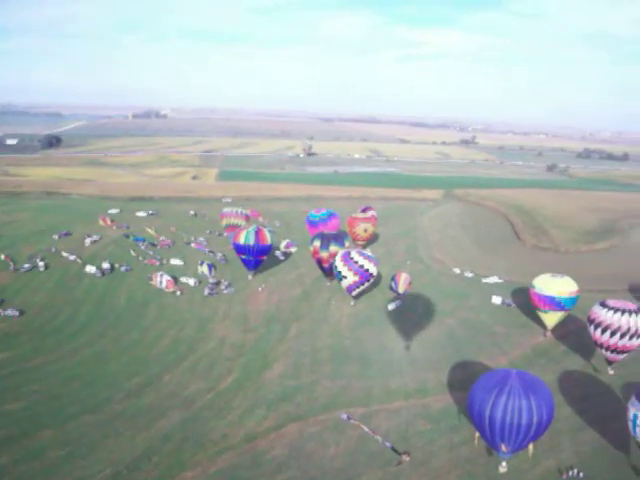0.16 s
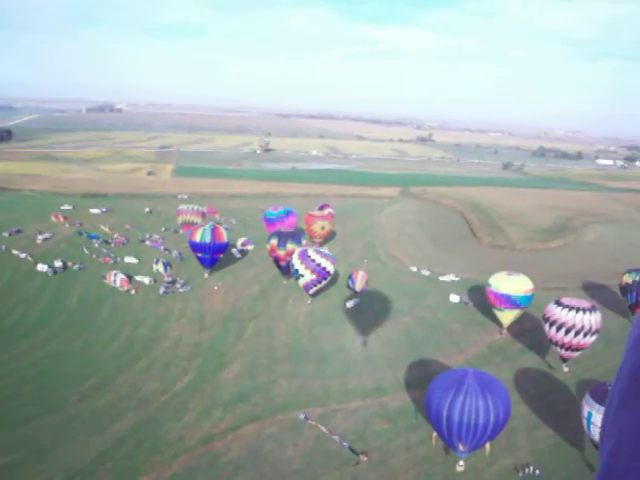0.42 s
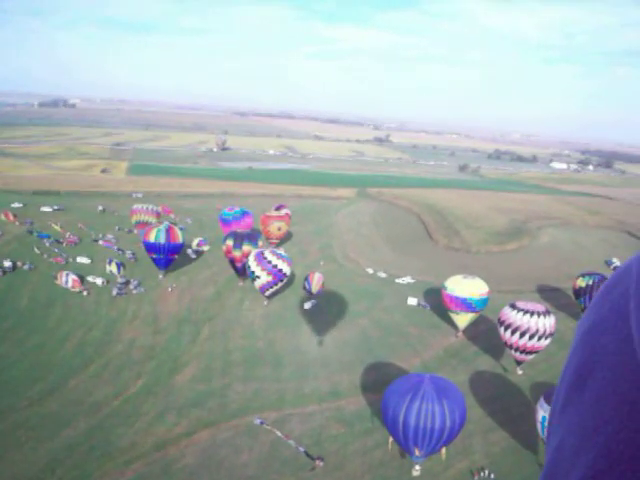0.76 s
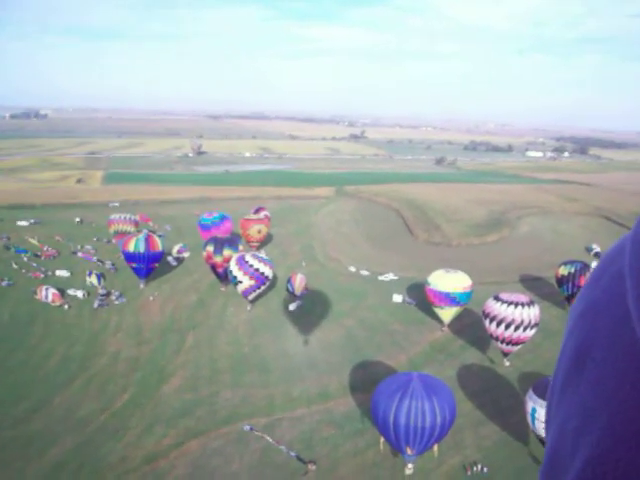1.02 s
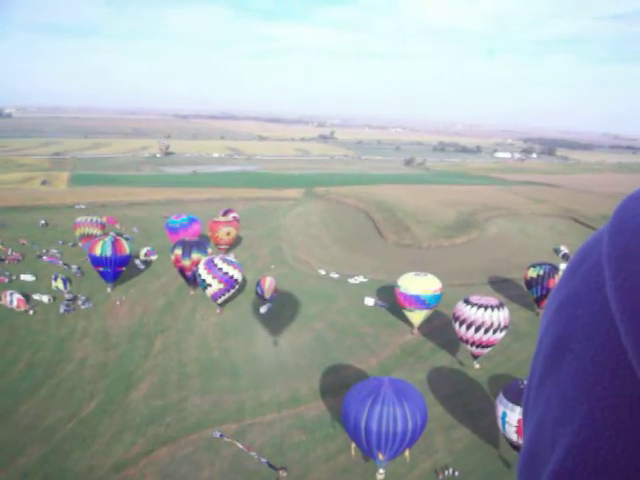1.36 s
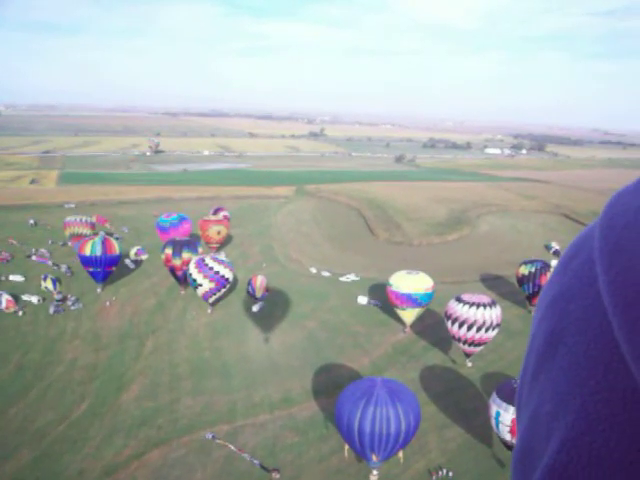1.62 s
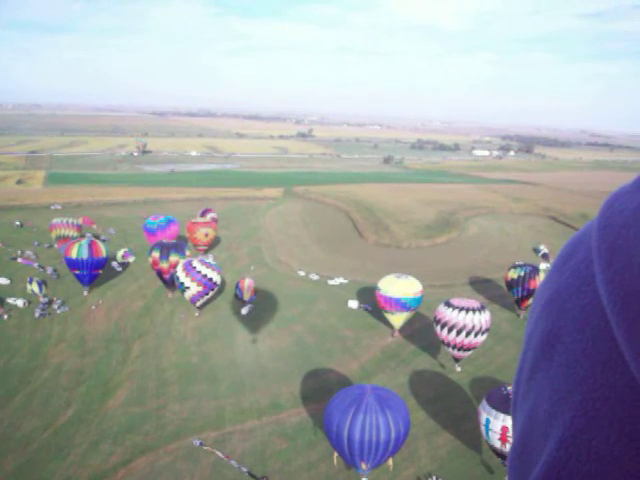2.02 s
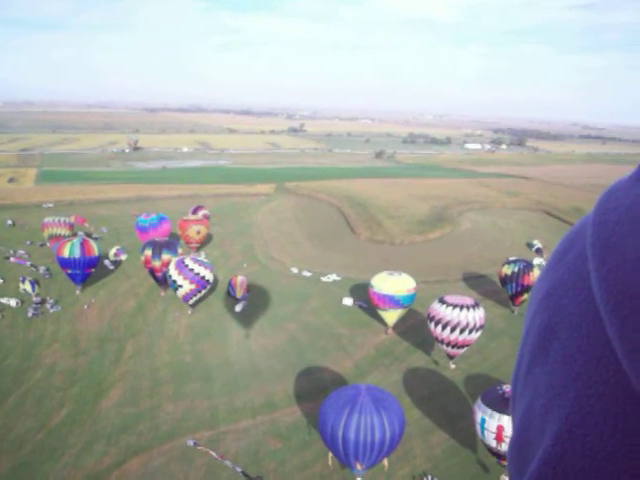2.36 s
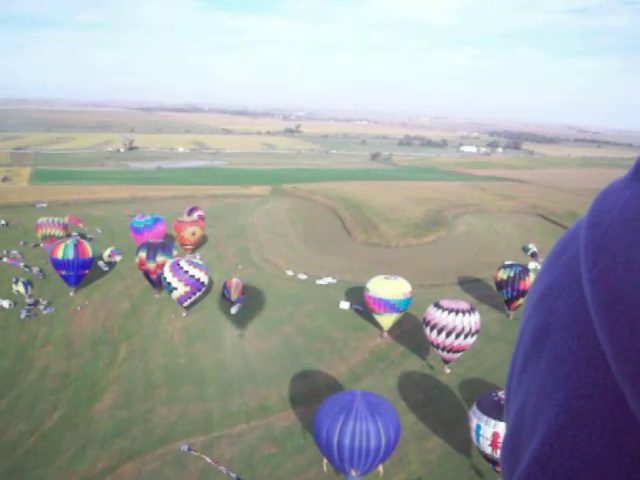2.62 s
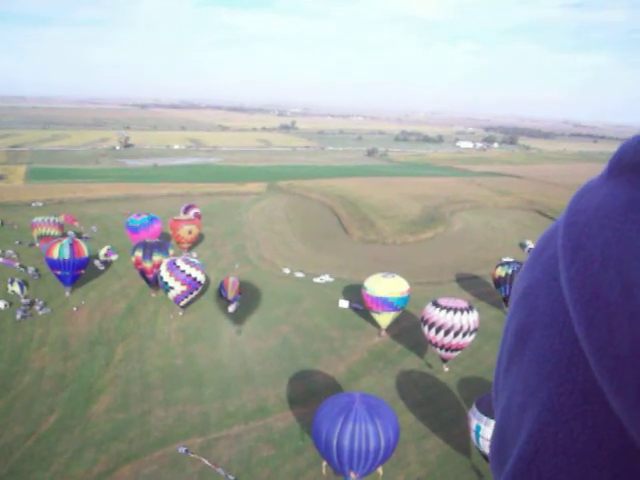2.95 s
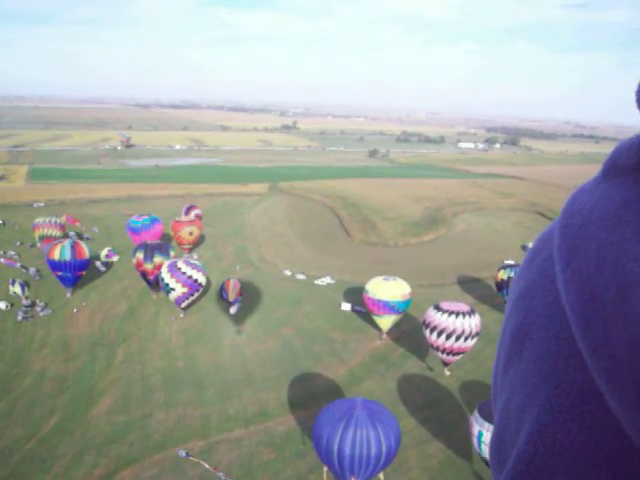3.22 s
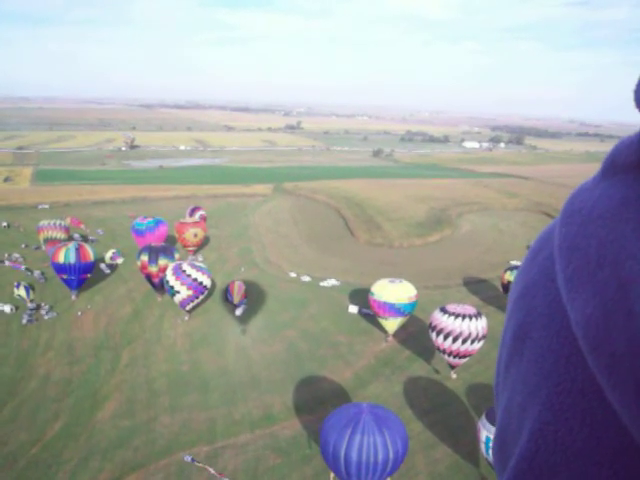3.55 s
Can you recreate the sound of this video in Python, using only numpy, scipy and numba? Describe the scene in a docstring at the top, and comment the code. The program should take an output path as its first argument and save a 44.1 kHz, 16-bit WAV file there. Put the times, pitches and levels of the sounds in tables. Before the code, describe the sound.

Steady close burner blast from start to end in an open-air balloon basket: deep roar, surging gas hiss, thudding pops; the overloaded, dull-topped camera microphone ducks after each pop.

```python
"""A propane burner blasts steadily just above a balloon basket: flame roar and jet hiss are flickering noise bands,
the hiss coloured by a short reflection. Small pops crackle throughout as short pressure pulses;
from 0.27 s on single pops at set times join them, most of them loud, one faint.
A small camera microphone is overdriven: its fast gain control ducks after each pop, the top is cut off
and peaks touch the converter's ceiling, three times with a faint tick; at 3.22 s they once overflow it."""
import sys
import numpy as np
from scipy import signal
from scipy.fft import rfft, irfft
from scipy.io import wavfile
from numba import njit

SR = 44100
rng = np.random.default_rng(int(sys.argv[2]) if len(sys.argv) > 2 else 0)


def int16_out(signal):
    """Quantize to a 16-bit WAV file."""
    q = np.round(np.clip(np.atleast_2d(signal).T, -1, 1) * 32767)
    wavfile.write(sys.argv[1], SR, q.astype(np.int16))


def to_linear_factor(level_db):
    """Convert decibel levels (scalar or array-like) to linear amplitude factors."""
    exponent = np.asarray(level_db, float) / 20
    return 10 ** exponent


N = 163170
TIME_S = np.arange(N) / SR
CEILING = 0.7  # largest value the converter can give, either sign


def rms_one(x):
    """Scale to rms 1."""
    return x / np.sqrt(np.mean(x ** 2) + 1e-20)


def drift(rate_hz):
    """Slow chance of spread 1: noise through a double one-pole low-pass, drawn at every 20th sample."""
    pole = np.exp(-40 * np.pi * rate_hz / SR)
    noise = rng.standard_normal(N // 20 + 2002)
    slow = signal.lfilter([1], [1, -2 * pole, pole * pole], noise)[2000:]  # skip the filter's start
    return np.interp(np.arange(N) / 20, np.arange(len(slow)), rms_one(slow - slow.mean()))


def noise_bands(spectrum, count):
    """Noise of this spectrum, rms 1, split into overlapping log-spaced bands that sum back to it."""
    hz, level_db = np.transpose(spectrum)
    log_hz = np.log(np.maximum(np.arange(N // 2 + 1) * SR / N, 1))
    shaped = rfft(rng.standard_normal(N)) * to_linear_factor(np.interp(log_hz, np.log(hz), level_db))
    centres = np.linspace(np.log(hz[1]), np.log(hz[-2]), count)
    bands = np.array([irfft(shaped * np.interp(log_hz, centres, row), N) for row in np.eye(count)])
    return bands / bands.sum(axis=0).std()


def roar():
    """Turbulent burning: low noise whose bands flicker on their own."""
    # flame roar as it reaches the microphone: [f/Hz, relative density/dB per Hz]
    roar_spectrum = [(12,-36), (20,-11.5), (30,-2.5), (40,0), (55,-0.5), (93,-3.5), (125,-1), (156,-0.5),
                     (180,-1.5), (207,-10.5), (258,-4.5), (330,-7), (490,-13), (568,-9.5), (631,-19.5),
                     (700,-23), (910,-49.5), (1540,-120)]
    level_db, flicker_db, flicker_hz = -17.5, 1.0, 24
    flickering = [band * to_linear_factor(flicker_db * drift(flicker_hz)) for band in noise_bands(roar_spectrum, count=6)]
    return to_linear_factor(level_db) * sum(flickering)


def hiss():
    """The gas jet: bright noise that surges, and flutters both as a whole and band by band."""
    # vigour of the jet and its brightness as the microphone turns: [t/s, level/dB, tilt/dB per octave]
    jet_course = [(0.0, -22.5, 0.3), (0.79, -24, 0), (1.3, -22.5, 0.13), (3.06, -24, -0.2), (3.7, -24, 0.8)]
    # jet hiss at the microphone, rippled by a short reflection: [f/Hz, relative density/dB per Hz]
    hiss_spectrum = [(410,-38.5), (700,-7), (836,0), (1080,-10), (1270,-5), (1440,-10), (1650,-7),
                     (1980,-7.5), (2220,-12), (2570,-7), (2740,-9.5), (3000,-5.5), (3200, -7), (3450,-6),
                     (4000, -11), (4500, -12.5), (4700, -15.5), (4900, -13.5), (5250,-16.5), (5550,-24),
                     (5800,-29.5), (6050,-36.5), (6400,-58)]
    # short surges of the jet: [t/s, rise above its vigour/dB]
    surges = [(.07, 3), (.3, 4.5), (.39, 3.5), (.512, 2), (.567, 1.5), (.66, 2.5), (.77, 5.5), (.84, 3.5),
              (.975, 4), (1.085, 2), (1.2, 2), (1.325, 3), (1.485, 4.5), (1.692, 3.5), (1.769, 1.5),
              (2.03, 2.5), (2.098, 2.5), (2.445, 5.5), (3.047, 2), (3.095, 3), (3.428, 3.5), (3.455, 2.5),
              (3.565, 5)]
    surge_width_s = 0.0062  # standard deviation of the bell-shaped swell
    flicker_db, flicker_hz = 0.72, 49
    band_flicker_db, band_flicker_hz = 0.94, 20.0
    octaves_per_band = 1 / 3

    s, vigour_db, tilt_db = np.transpose(jet_course)
    level_db = np.interp(TIME_S, s, vigour_db) + flicker_db * drift(flicker_hz)
    for at, up_db in surges:
        level_db += up_db * np.exp(-0.5 * ((TIME_S - at) / surge_width_s) ** 2)

    tilt_per_band_db = np.interp(TIME_S, s, tilt_db) * octaves_per_band
    bands = noise_bands(hiss_spectrum, count=10)
    jet = np.zeros(N)
    for k, band in enumerate(bands):
        bright_db = tilt_per_band_db * (k - len(bands) // 2)
        jet += band * to_linear_factor(bright_db + band_flicker_db * drift(band_flicker_hz))
    return to_linear_factor(level_db) * jet


def pops():
    """Pockets of gas catch fire: short round pressure pulses, mostly suction, single ones among many small."""
    # single pops of the flame, most of them loud, one faint:
    # [t/s, pulse peak before the low cut/dB, sign of pressure]
    single_pops = [(0.266, -2, -1), (0.321, 3.5, -1), (0.4766, -1.5, -1), (0.5253, -4, 1),
                   (0.8115, -6.5, -1), (0.9166, -3, -1), (0.9832, -0.5, -1), (1.429, 1, -1), (1.535, 1, -1),
                   (1.8345, -3, -1), (1.976, -2.5, -1), (2.1441, 0, -1), (2.215, 4.5, -1), (2.3056, -2, -1),
                   (2.4662, -1, -1), (2.5754, -17, 1), (2.6256, -8, 1), (2.7567, -4, -1),
                   (2.8722, -0.5, -1), (2.9354, 3.5, -1), (2.973, -2.5, 1), (3.1245, -7, -1),
                   (3.2251, 2, 1), (3.2759, -5.5, -1), (3.3157, -2, -1), (3.3836, -2, 1), (3.3893, -1, -1),
                   (3.3903, 0, -1), (3.4868, -3, 1)]
    pulse_width_s, low_cut_hz = 0.00056, 69.5  # width: standard deviation
    small_per_s, suction_share = 110, 0.7
    small_db, small_spread_db = -16.5, 2.06  # faintest small pop, mean rise above it before the size limit

    size = np.minimum(rng.exponential(1, N), 2.5)
    sign = np.where(rng.random(N) < suction_share, -1, 1)
    happens = rng.random(N) < small_per_s / SR
    clicks = happens * sign * to_linear_factor(small_db + small_spread_db * size)

    s, single_db, single_sign = np.transpose(single_pops)
    clicks[(s * SR).astype(int)] = to_linear_factor(single_db) * np.sign(single_sign)

    pulse = np.exp(-0.5 * (np.arange(-200, 201) / SR / pulse_width_s) ** 2)
    low_cut = signal.butter(1, low_cut_hz, "high", fs=SR, output="sos")
    return signal.sosfilt(low_cut, signal.fftconvolve(clicks, pulse, "same"))


@njit
def peak_follower(x, rise, fall, start):
    """Level that climbs fast to the peaks and sinks slowly."""
    out, level = np.empty_like(x), start
    for i in range(len(x)):
        size = abs(x[i])
        level += (size - level) * (rise if size > level else fall)
        out[i] = level
    return out


def gain_control(x):
    """Fast level control: its follower lags the peaks, so a pop gets through and the sound after it ducks."""
    attack_s, release_s = 0.0011, 0.018
    knee_db, squeeze, makeup_db = -16, 0.95, 5  # squeeze: dB taken off per dB well above the knee
    level = peak_follower(x, 1 / (attack_s * SR), 1 / (release_s * SR), to_linear_factor(knee_db))
    gain = (1 + (level / to_linear_factor(knee_db)) ** 4) ** (-squeeze / 4)
    return to_linear_factor(makeup_db) * x * gain


def soft_overload(x):
    """Overdriven amplifier: peaks bend over smoothly towards a soft top."""
    soft_top = 0.66
    return x * (1 + (x / soft_top) ** 10) ** (-1 / 10)


def top_cut(x):
    """Steep low-pass: 80 dB down from 6500 Hz upwards; its ringing lifts some peaks again."""
    return signal.sosfilt(signal.cheby2(24, 80, 6500, fs=SR, output="sos"), x)


def converter(x):
    """Hard ceiling, with a faint one-sample tick where a pop grazes it."""
    # ticks at the ceiling: [t/s, peak/dB]
    ticks = [(0.3194, -34.5), (1.8346, -37), (3.3156, -30.5)]
    x = np.clip(x, -CEILING, CEILING)
    s, tick_db = np.transpose(ticks)
    x[(s * SR).astype(int)] += to_linear_factor(tick_db)
    return x


def overflow(x):
    """One numeric overflow: the wave, pinned at the ceiling, wraps for an instant to the opposite rail."""
    start_s, length_s, edge_s = 3.22468, 0.000165, 0.000075
    since = TIME_S - start_s
    flipped = np.clip(np.minimum(since, length_s - since) / edge_s + 0.5, 0, 1)
    near = np.exp(-0.5 * ((since - length_s / 2) / (2 * length_s)) ** 4)
    pinned = x + (CEILING - x) * near
    return pinned * (1 - 2 * flipped)


def scene():
    """The burner, close by; a short reflection off basket or operator colours the hiss."""
    return (roar() + hiss() + pops())[None]


def band_limit(x):
    """A steep low-pass at the top of the band."""
    return signal.sosfilt(signal.butter(12, 15850, fs=SR, output="sos"), x)


def record(dry):
    """The camera microphone: gain control, soft overload, top cut, hard ceiling with ticks, one overflow."""
    ducked = gain_control(dry[0])
    dull = top_cut(soft_overload(ducked))
    mix = overflow(converter(dull))
    return band_limit(mix)


dry = scene()
out = record(dry)
int16_out(out)
```